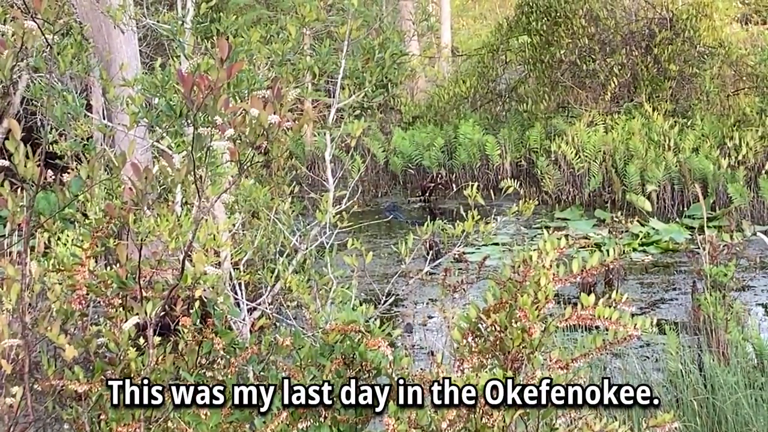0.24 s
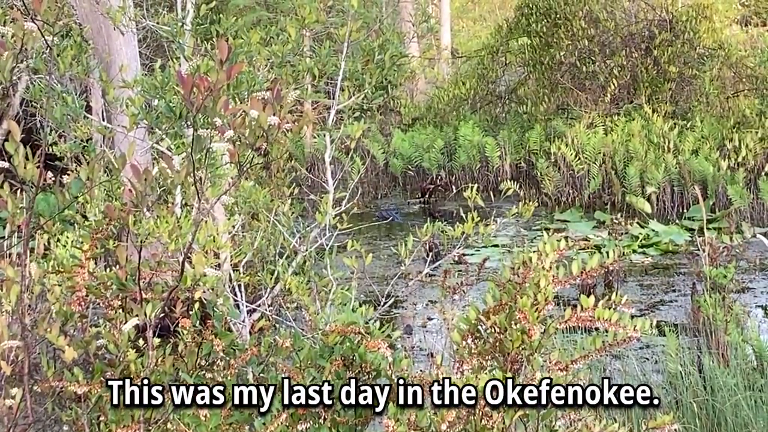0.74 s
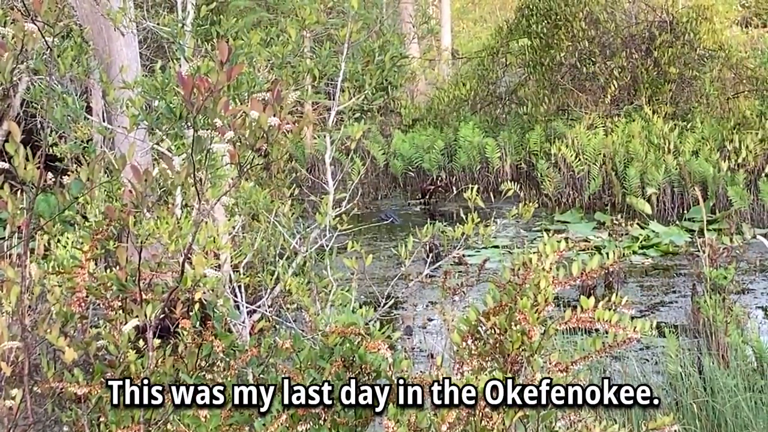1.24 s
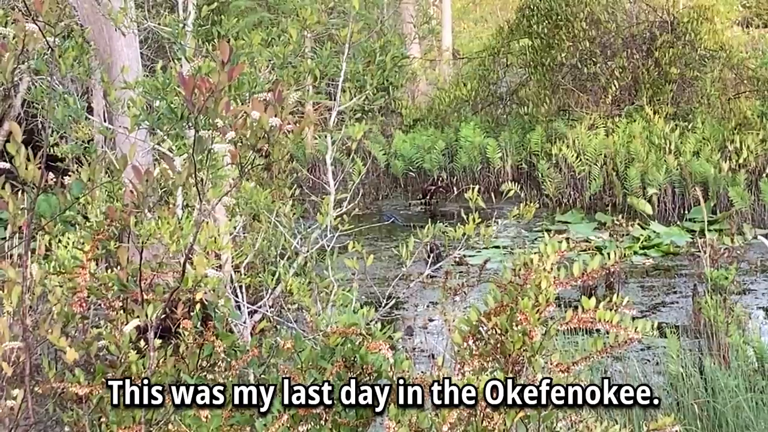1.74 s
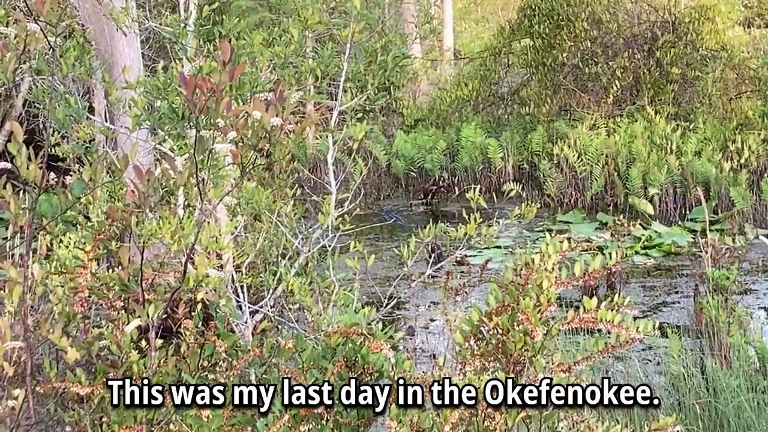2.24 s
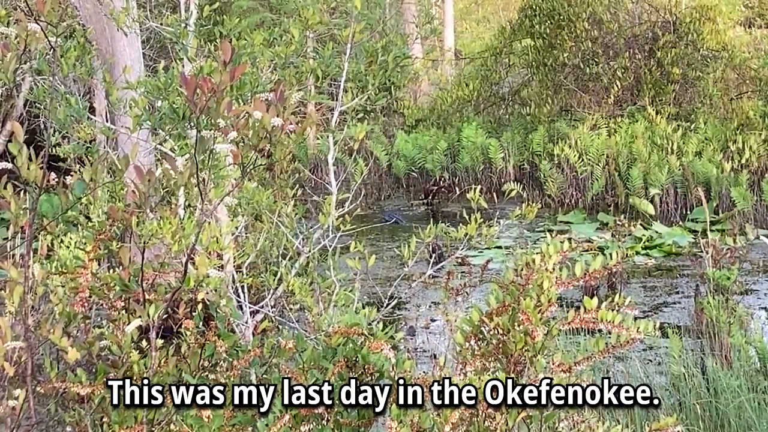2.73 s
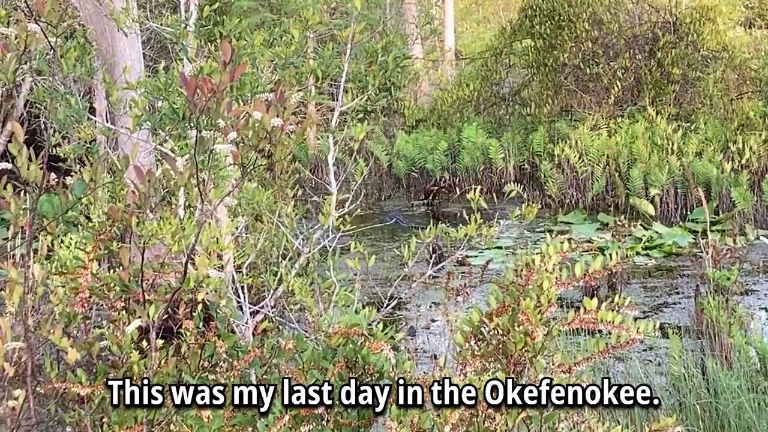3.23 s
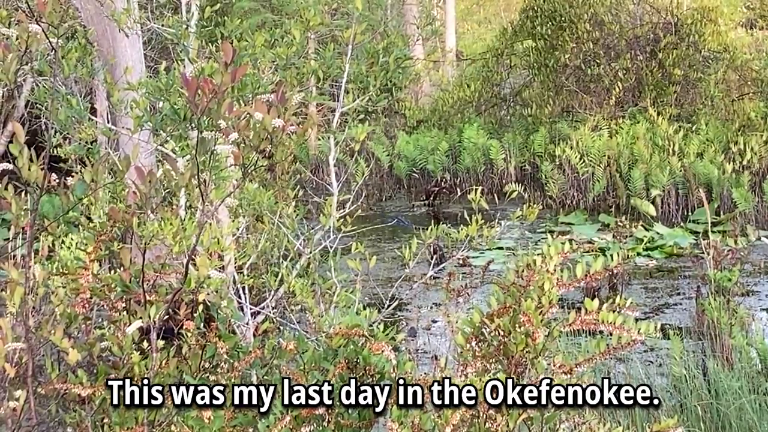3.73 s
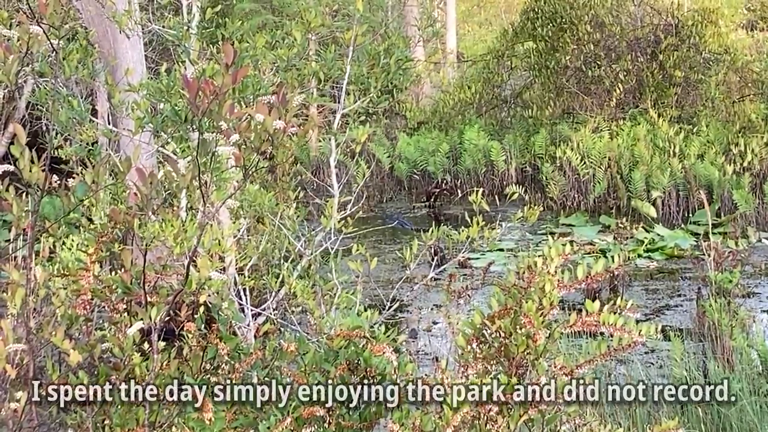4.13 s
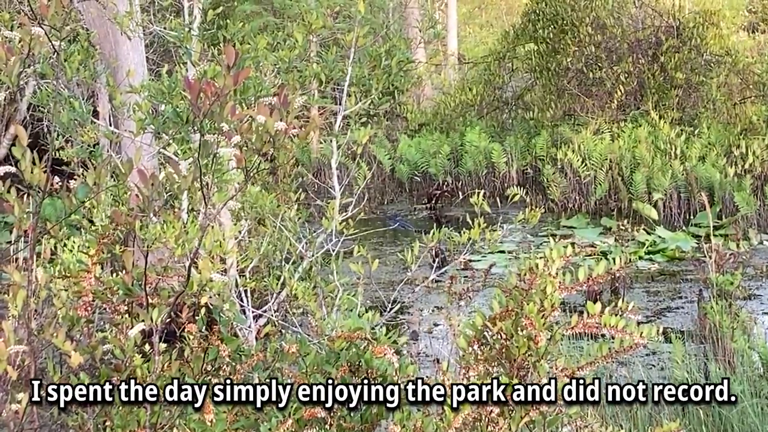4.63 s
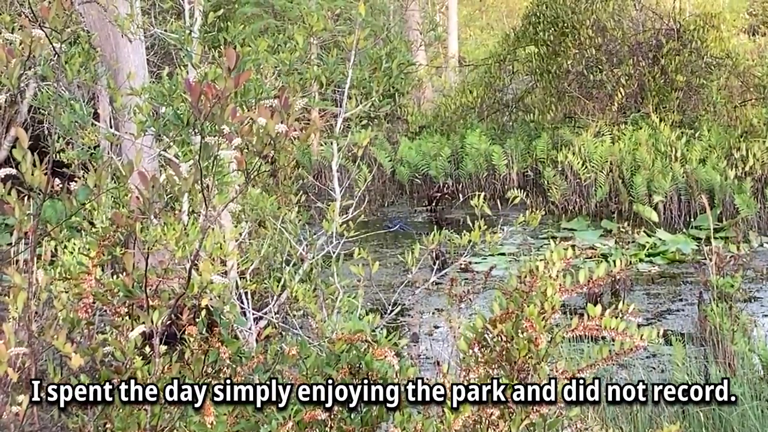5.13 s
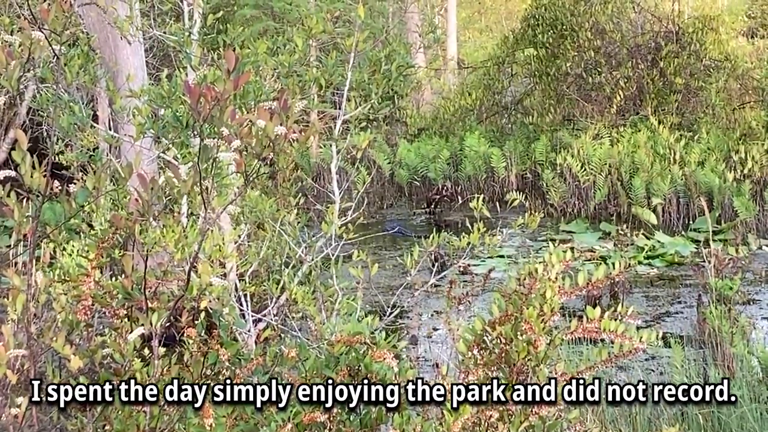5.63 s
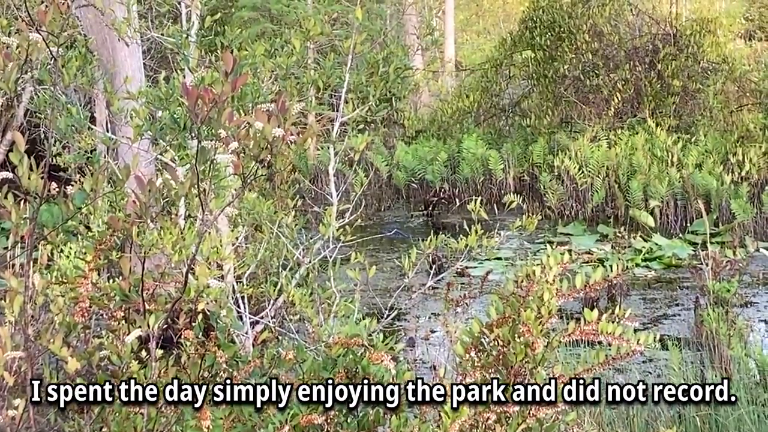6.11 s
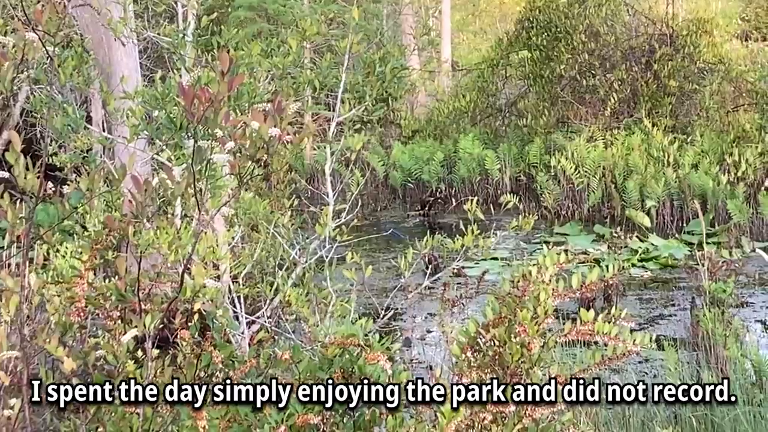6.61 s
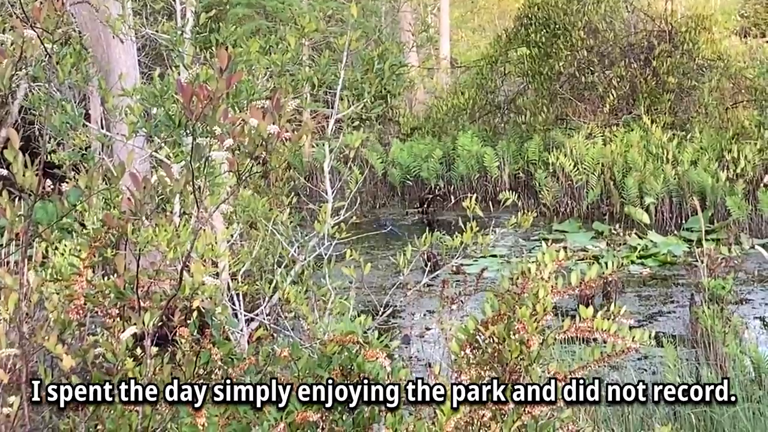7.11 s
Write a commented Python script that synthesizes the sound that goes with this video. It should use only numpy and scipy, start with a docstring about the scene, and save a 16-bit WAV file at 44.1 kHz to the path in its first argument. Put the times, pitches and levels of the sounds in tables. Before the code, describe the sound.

Loud clicking frog calls punctuate a quiet daytime swamp, with distant frog chorus, soft high insect trilling, and faint birds whistling toward the end.

```python
"""A still swamp by day. From the start small frogs near and far rattle click trains that ring their throats,
crickets trill in tone strokes, and a bird whistles gliding tones over filtered-noise rumble and hiss of air.
Just before two seconds one big frog grunts: slow pulses and rasp through a vocal sac.
A breath of wind swells the noise after four and a half seconds; then birds whistle rises, pips, chirps and
arches to the end. Fading noise tails echo every animal off trees and water."""
import sys
import numpy as np
from scipy import signal
from scipy.fft import rfft, irfft
from scipy.io import wavfile
from scipy.ndimage import uniform_filter1d, minimum_filter1d

SR = 44100
rng = np.random.default_rng(int(sys.argv[2]) if len(sys.argv) > 2 else 0)


def voltage_ratio(level):
    """Linear amplitude factor for a level in decibels (scalar or array-like)."""
    return 10 ** (np.asarray(level, float) / 20)


def inscribe(sig):
    """Save sig as 16-bit PCM at rate SR to the path in sys.argv[1].

    A 1-D sig is mono; a 2-D sig holds one channel per row.
    Samples are clipped to [-1, 1] before scaling.
    """
    pcm = np.round(np.clip(np.atleast_2d(sig).T, -1, 1) * 32767)
    wavfile.write(sys.argv[1], SR, pcm.astype(np.int16))


N = 324576
TIME = np.arange(N) / SR
SIDES = np.array([[1], [-1]])  # left, right


def level(x, db):
    """Scale to an rms level."""
    return x * voltage_ratio(db) / np.sqrt(np.mean(x ** 2))


def band(x, hz, width):
    """Two-pole resonance, gain 1 at the centre."""
    return signal.lfilter(*signal.iirpeak(hz, hz / width, fs=SR), x)


def add(out, s, sound):
    """Mix a two-channel sound in at time s."""
    i = int(s * SR)
    n = min(sound.shape[1], N - i)
    out[:, i:i + n] += sound[:, :n]


def place(pan_db):
    """Left and right gains for a left-minus-right level difference."""
    return voltage_ratio(SIDES * pan_db / 2)


def on_log(table, hz):
    """Read (Hz, value) points on a log-frequency axis."""
    points = np.array(table)
    return np.interp(np.log(hz), np.log(points[:, 0]), points[:, 1])


# small frogs' calls, the shortest being single clicks: start_s [s], level_db [dB], length_s [s], frog [name]
FROG_CALLS = [(0.034, -22, .051, "ahead"), (0.086, -22.5, .022, "shrill"), (0.217, -11, .054, "rival"),
              (.428, -19, .003, "shrill"), (0.607, -31, .004, "rival"), (0.7517, -23, .004, "lily"),
              (0.7776, -22, .051, "reeds"), (.97, -24, .0067, "lily"), (1.0948, -2, .055, "near"),
              (1.162, -10, .061, "rival"), (1.428, -24.5, 0.038, "deep"), (1.556, -17.5, .028, "across"),
              (1.712, -27, .018, "across"), (1.772, -23.5, .048, "reeds"), (2.019, -21.5, .05, "ahead"),
              (2.147, -12.5, .065, "rival"), (2.235, -15, .004, "shrill"), (2.493, -28, .029, "reeds"),
              (2.569, -23, .048, "lily"), (2.971, -1.5, .06, "near"), (3.043, -25, .05, "reeds"),
              (3.11, -22, .029, "reeds"), (3.307, -19, .043, "ahead"), (3.388, -20, .051, "lily"),
              (3.498, -22.5, .05, "shrill"), (3.7466, -12.5, .064, "rival"), (3.901, -23, .037, "lily"),
              (4.237, -31, .024, "reeds"), (4.315, -22.5, .049, "shrill"), (4.353, -14.5, .004, "reeds"),
              (4.4355, -16.5, .004, "rival"), (4.466, -10.5, .047, "rival"), (4.52, -2.5, 0.055, "near"),
              (4.599, -21.5, .055, "shrill"), (4.6942, -23.5, .037, "reeds"), (4.8, -18, .005, "lily"),
              (5.013, -14, .004, "rival"), (5.0253, -14.5, .004, "rival"), (5.065, -11, .045, "rival"),
              (5.436, -29, .034, "reeds"), (5.517, -21, .041, "shrill"), (5.6025, -16.5, .004, "rival"),
              (5.615, -14.5, .004, "rival"), (5.661, -10.5, 0.037, "rival"), (5.787, -23.5, .016, "lily"),
              (5.821, -18.5, .049, "ahead"), (5.908, -26, .051, "across"), (6.1, -25, .054, "lily"),
              (6.1446, -2, .062, "near"), (6.244, -9.5, .035, "rival"), (6.3445, -14.5, .004, "shrill"),
              (6.365, -16, .004, "shrill"), (6.39, -25, .025, "reeds"), (6.517, -16, .041, "across"),
              (6.701, -31.5, .074, "across"), (6.761, -19, .004, "rival"), (6.785, -16, .004, "rival"),
              (6.8266, -10.5, .034, "rival"), (7.0173, -18, .051, "ahead"), (7.279, -14, .004, "rival"),
              (7.287, -21, .02, "lily"), (7.353, -14, .009, "rival")]
# the frogs one can tell apart, by name: pitch_hz [Hz], rate [clicks/s], pan_db [dB, left minus right],
# lag_ms [ms, left behind right], swell_db [dB, how far below full level a rattle begins]
FROG_VOICES = {"near": (3790, 203, -2, -.25, -1), "rival": (3650, 200, -2, 0.5, 3),
               "ahead": (3562, 250.5, 1, 0.06, 0), "reeds": (3741.5, 194.5, -2, 0.05, 1),
               "shrill": (3949.5, 185, -2.5, -0.2, 1.5), "across": (3850, 184.5, -2.5, 0.6, 1.5),
               "lily": (3792, 180, -0.5, 0.5, 2.5), "deep": (3150, 159.5, 3.5, 0.5, 4.5)}


def frogs():
    """The calls one can point at; a frog's pitch and pace vary a little from call to call."""
    out = np.zeros((2, N))
    lucks = rng.standard_normal((len(FROG_CALLS), 25, 2))
    for (s, db, length, name), luck in zip(FROG_CALLS, lucks):
        hz, rate, pan_db, lag_ms, swell_db = FROG_VOICES[name]
        mood = luck[-1]
        call_rate = rate * (1 + .04 * mood[0])
        call_hz = hz * (1 + 0.0033 * mood[1])
        add(out, s, small_frog(db, length, call_rate, call_hz, pan_db, lag_ms, luck[:-1], swell_db))
    return out


SPEED_UP = .18  # how much the click spacing shrinks over a call, as a share of its mean
TENSION = .02  # share by which a tense click rings higher and a slack one lower


def small_frog(db, length, rate, hz, pan_db, lag_ms, luck, swell_db=0):
    """A quickening train of clicks; those that come early are tense, the late ones slack."""
    progress = np.arange(len(luck)) / max(length * rate, 1)
    spacing = 1 + .04 * luck[:, 0] + SPEED_UP * (.5 - np.minimum(progress, 1))
    at = np.cumsum(spacing) / rate
    at -= at[0]
    on = at <= length
    done = at[on] / length
    # rattles swell at first, calls of one or two clicks are firm
    swell = swell_db * (on.sum() > 2) * (1 - done) ** 3
    # the last clicks weaken as the breath runs out
    size = voltage_ratio(1.5 * luck[on, 1] * (at[on] > 0) - swell - 9 * done ** 3)
    call = 0
    for tense in (1, -1):
        train = np.zeros(int(at[-1] * SR) + 1)
        train[(at[on] * SR).astype(int)] = size * (tense * luck[on, 0] < 0)
        ring = click_ring(db, hz * (1 + tense * TENSION), lag_ms)
        call = call + signal.fftconvolve(ring, train[None])
    return call * voltage_ratio(db) * place(pan_db)


# throat resonances that each click rings: ratio [multiple of the throat pitch],
# mode_db [dB, for a call at 0 dB], t60 [s]
THROAT_MODES = [(1, -3.5, 0.02), (0.918, -13.5, 0.014), (1.081, -20.5, 0.014), (0.473, -21, 0.0076),
                (0.659, -21, 0.012), (0.801, -20, 0.012), (1.341, -26, 0.0078), (1.619, -23, 0.0068),
                (1.85, -16, 0.0058), (2.08, -16.5, 0.0059), (2.38, -15.5, 0.0042), (2.618, -21, 0.0057),
                (3.599, -29.5, 0.0051), (4.0, -40.5, 0.0058)]
FAR_DULL = 0.65  # dB lost by modes well off the pitch, per dB of distance
FAR_SPREAD = .5  # dB gained by the two side rings per dB of distance: far calls sound broader
SAG, SAG_S = 0.027, 0.0028  # share by which each click starts sharp; settling time constant
SWELL_S = .0006  # time constant of the click's onset
CLICK_FLOOR = signal.butter(4, 1350, "high", fs=SR, output="sos")


def click_ring(db, hz, lag_ms):
    """One click, swelling for a millisecond and ringing out in the throat; call level stands for distance."""
    late = np.maximum(np.arange(900) / SR - .0005 - SIDES * lag_ms / 2000, 0)
    ratio, mode_db, t60 = np.transpose(THROAT_MODES)[:, :, None, None]
    overtone = np.abs(np.log2(ratio)) > 1 / 4
    beside = ~overtone & (ratio != 1)
    distant_db = mode_db + (overtone * FAR_DULL - beside * FAR_SPREAD) * db
    gain = voltage_ratio(np.minimum(distant_db, -3 * beside))
    turns = hz * (late + SAG * SAG_S * (1 - np.exp(-late / SAG_S)))
    fade = np.exp(-np.log(1000) * late / t60)
    ring = gain * fade * np.sin(2 * np.pi * ratio * turns)
    onset = (1 - np.exp(-late / SWELL_S)) ** 2
    click = signal.sosfilt(CLICK_FLOOR, ring.sum(axis=0) * onset)
    return click / np.abs(click).max()


# big frog's vocal sac: pitch_hz [Hz], width_hz [Hz, before two unequal filter passes],
# level_db [dB rms, relative to the grunt level]
SAC_MODES = [(319, 13, -4), (350, 48, -6.5), (425, 40, -10), (620, 150, -15), (1230, 240, -9),
             (1670, 170, -15), (1850, 120, -18)]
GRUNT_HZ = 42  # glottal pulses per second
# effort rises, holds and dies away
GRUNT_S, GRUNT_DB, GRUNT_RISE_S, GRUNT_HOLD_S = 1.921, -31, 0.07, .075
GRUNT_RISE_DB, GRUNT_FALL_DB_PER_S = 13, 210
GRUNT_OPENING = .7  # extra dB the upper resonances lose per dB of missing effort


def big_frog():
    """Slow glottal pulses, each trailing a rasp of air, ring a large vocal sac."""
    t = TIME - GRUNT_S
    rise_db = np.maximum(GRUNT_RISE_DB * (1 - t / GRUNT_RISE_S), 0)
    fall_db = GRUNT_FALL_DB_PER_S * np.maximum(t - GRUNT_RISE_S - GRUNT_HOLD_S, 0)
    missing_db = np.minimum(rise_db + fall_db, 150)
    beat = GRUNT_HZ * (TIME - 1.952)
    count = np.floor(beat)
    pulses = np.diff(count, prepend=count[0]) * (-1) ** count  # push and pull in turn
    rasp = rng.standard_normal(N) * np.exp(-(beat % 1) / 2.9)
    voice = 0
    for hz, width, mode_db in SAC_MODES:
        # the rasp rules the upper resonances, which open up only at full effort
        upper = min(hz / 800, 1) ** 2
        drive = pulses + .05 * (.15 + upper) * rasp
        once = band(drive, hz, 1.7 * width)
        ring = level(band(once, hz, 0.87 * width), mode_db)
        voice = voice + ring * voltage_ratio(GRUNT_DB - missing_db * (1 + GRUNT_OPENING * upper))
    voice = voice * (t > 0)
    return np.array([voice, np.roll(voice, shift=9)])  # right lags by 9 samples


# rising whistle's shape: after_s [s from its start], pitch_hz [Hz], note_db [dB, added to the repeat's level]
RISE_SHAPE = [(0, 2330, -16), (.02, 2450, -6), (.06, 2720, 0), (.085, 2990, -3), (.1, 3150, -20)]
# rising whistle's repeats: start_s [s], level_db [dB]
RISE_REPEATS = [(5.669, -37.5), (6.031, -40), (6.405, -37.5), (6.783, -38), (7.1, -39.5)]
# short, nearly level notes: start_s [s], length_s [s], level_db [dB]
PIP_NOTES = [(.155, 0.067, -42), (.48, .06, -43.5), (6.011, 0.042, -39), (6.248, 0.034, -36),
             (6.327, 0.071, -40.5), (6.595, 0.09, -46), (6.893, 0.033, -31.5), (6.935, 0.034, -32),
             (6.984, 0.036, -39), (7.191, 0.038, -31.5), (7.245, 0.04, -37)]
PIP_HZ = 3225  # pitch the pips glide around
# quick upward chirp's shape: after_s [s], pitch_hz [Hz], note_db [dB, added to the repeat's level]
CHIRP_SHAPE = [(0, 3650, -14), (.008, 3900, 0), (.02, 4250, -2), (.028, 4200, -16)]
# chirp's repeats: start_s [s], level_db [dB]
CHIRP_REPEATS = [(6.694, -37), (6.99, -34)]
# second bird, a held note and an arch: after_s [s], pitch_hz [Hz], note_db [dB, added to the repeat's level]
ARCH_SHAPE = [(0, 1630, -18), (.012, 1690, -10), (.045, 1660, -8), (.058, 1590, -12), (.068, 1900, -4),
              (.085, 2440, -9), (.1, 2250, -8), (.11, 1970, -3), (.118, 1850, -18)]
# arch's repeats: start_s [s], level_db [dB]
ARCH_REPEATS = [(0.014, -39.5), (0.324, -39.5), (5.859, -52), (6.16, -46), (6.459, -41), (6.749, -39),
                (7.052, -38)]
BIRD_WET_DB = -9


def birds():
    """Rises and arches come about three times a second in each run, with pips and chirps among them."""
    out = np.zeros((2, N))
    for s, db in RISE_REPEATS:
        add(out, s, whistle(RISE_SHAPE, db, 1.9, 0.044))
    for s, length, db in PIP_NOTES:
        pip = [(0, PIP_HZ - 60, -20), (.008, PIP_HZ + 40, 0),
               (length - .008, PIP_HZ - 30, -4), (length, PIP_HZ - 60, -20)]
        add(out, s, whistle(pip, db, 0.88, .03))
    for s, db in CHIRP_REPEATS:
        add(out, s, whistle(CHIRP_SHAPE, db, 1.0, .03))
    for s, db in ARCH_REPEATS:
        add(out, s, whistle(ARCH_SHAPE, db, -0.78, 0.12))
    # they sit deep among the trunks, so much of their sound arrives scattered
    return out + echoes(out, 0.15, BIRD_WET_DB, 0.0067)


BIRD_FLICKER_DB, BIRD_FLICKER_S = 4, .012  # foliage breaks up the far whistles: spread and pace


def whistle(shape, db, pan_db, lag_ms):
    """A pure tone that follows a pitch and level shape and flickers on its way through the leaves."""
    s, hz, note_db = np.transpose(shape)
    t = np.arange(int(s[-1] * SR)) / SR
    pitch = np.interp(t, s, hz)
    flicker = BIRD_FLICKER_DB * np.interp(t / BIRD_FLICKER_S, np.arange(16), rng.standard_normal(16))
    phase = 2 * np.pi * (np.cumsum(pitch) / SR - SIDES * pitch * lag_ms / 2000)
    return np.sin(phase) * voltage_ratio(db + flicker + np.interp(t, s, note_db)) * place(pan_db)


# nearest cricket's bouts: start_s [s], length_s [s], level_db [dB, before the bouts are doubled]
CRICKET_BOUTS = [(.13, .19, -36.5), (0.88, 0.17, -40), (1.6, 0.23, -39.5), (2.8, 0.17, -40),
                 (3.501, 0.15, -38.5), (4.204, 0.19, -39), (4.935, 0.15, -36), (5.586, 0.15, -38),
                 (6.326, 0.19, -36), (7.03, 0.17, -38.5)]
FAR_CRICKETS_DB = -45
FAR_BOUT_S, FAR_BOUT_DB = 0.61, 3  # far swell's length, varied per cricket; rise and dip about the mean


def crickets(count=5):
    """One near cricket in bouts; several further off that swell and sink, each at its own pace."""
    bouts = 0
    for s, length, db in CRICKET_BOUTS:
        edges = np.minimum((TIME - s) / 0.06, (s + length - TIME) / 0.013)
        bouts = bouts + voltage_ratio(db) * np.clip(edges, 0, 1)
    near = 2 * bouts * cricket(4455, 46, -15, 0.042, 0)
    far = 0
    for k, u in enumerate(rng.random((count, 6))):
        hz = 4300 + 450 * (k + u[0]) / count
        trill = cricket(hz, 47 + 12 * u[1], -23.5, .5 * u[2] - .25, u[3])
        turn = TIME / FAR_BOUT_S / (0.785 + 0.45 * u[4]) + u[5]
        far = far + trill * voltage_ratio(FAR_BOUT_DB * np.sin(2 * np.pi * turn))
    return near + level(far, FAR_CRICKETS_DB)


def cricket(hz, rate, octave_db, lag_ms, start):
    """Wing strokes: each a short tone that sags in pitch, with its own size and a faint octave."""
    beat = rate * TIME + start
    stroke = beat % 1
    luck = rng.standard_normal((500, 2))[beat.astype(int)]
    pitch = hz + 40 * luck[:, 0] + 120 * (.3 - stroke)
    phase = 2 * np.pi * (np.cumsum(pitch) / SR - SIDES * hz * lag_ms / 2000)
    shape = np.sin(np.pi * np.clip(stroke / .65, 0, 1)) ** 2
    tone = np.sin(phase) + voltage_ratio(octave_db) * np.sin(2 * phase)
    return shape * voltage_ratio(2.8 * luck[:, 1]) * tone


# level of the far chorus together with the blurred tails of nearer calls: time_s [s], level_db [dB]
CHORUS_LEVEL = [(0, -34), (.5, -43), (1.35, -42), (2.4, -45.5), (3.03, -47.5), (3.25, -40.5), (4.1, -44),
                (4.55, -33), (4.8, -43), (5.43, -43.5), (5.7, -36), (6.1, -39), (6.31, -34), (6.9, -39),
                (7.36, -34)]


def far_frogs(count=50, size=22):
    """Distant callers, each with its own pitch, distance and bearing, calling at random moments."""
    out = np.zeros((2, N))
    callers = rng.random((count, 6))
    moments = rng.random((count, size))
    lucks = rng.standard_normal((count, 16, 2))
    for u, when, luck in zip(callers, moments, lucks):
        hz = 3050 + 640 * (u[0] + u[2])
        call = small_frog(-36 - 7 * u[1], 0.056 * u[5] + 0.0055, 200, hz, 4 * u[3] - 2.5,
                          0.623 * u[4] - .28, luck)
        for s in when * TIME[-1]:
            add(out, s, call)
    # the chorus has no beginning: calls are already under way at the start
    chorus = np.roll(out, N // 2, axis=1)
    return level(chorus, 0) * voltage_ratio(np.interp(TIME, *np.transpose(CHORUS_LEVEL)))


def echoes(x, t60, db, gap_s):
    """Scattering from trunks and water: a fading noise tail, different in each channel."""
    t = np.arange(int(t60 * SR)) / SR
    tail = rng.standard_normal((2, len(t))) * np.exp(-np.log(1000) * t / t60) * (t > gap_s)
    tail = signal.lfilter([.5, .5], [1], tail)  # softens the treble
    tail = tail / np.sqrt(np.sum(tail ** 2) / 2)
    return voltage_ratio(db) * signal.fftconvolve(x, tail, axes=1)[:, :N]


# tone of the air: frequency_hz [Hz], level_db [dB, relative]
AIR_TONE = [(12, -38), (25, -7), (62, -2.5), (100, -6.5), (189, -17), (340, -16), (476, -25), (1000, -24.5),
            (2490, -34), (4700, -33.5), (5400, -49.5), (9300, -32), (10700, -41.5), (11700, -55.5),
            (13000, -38), (14500, -37), (16300, -71)]
# how alike left and right are in the air: frequency_hz [Hz], likeness [-1 opposed to 1 same]
AIR_LIKENESS = [(60, 0.87), (130, 0.37), (290, 0.072), (640, -0.64), (1400, -0.73), (3100, 0.2),
                (7000, 0.28), (15000, -0.81)]
AIR_DB = -43.5  # rms before the gust
# one breath of wind
GUST_S, GUST_LENGTH_S, GUST_EDGE_S, GUST_LEAVES_DB, GUST_RUMBLE_DB = 4.54, 1.35, 0.18, 3, 2


def air():
    """Smooth distant hiss and rumble; the lowest octaves and the leaves swell with a gust."""
    hz = np.maximum(np.fft.rfftfreq(N, 1 / SR), 1)
    alike = np.clip(on_log(AIR_LIKENESS, hz), -1, 1)
    noise = rfft(rng.standard_normal((2, N))) * voltage_ratio(on_log(AIR_TONE, hz))
    mid, side = noise * np.sqrt([1 + alike, 1 - alike])
    both = rfft(level(irfft(mid + SIDES * side, N), AIR_DB))
    low = 1 / (1 + (hz / 110) ** 4)
    leaf = np.exp(-np.log2(hz / 800) ** 4)
    gust_edges = np.minimum(TIME - GUST_S, GUST_S + GUST_LENGTH_S - TIME) / GUST_EDGE_S
    gust = np.clip(gust_edges, 0, 1)
    rest = irfft(both * (1 - low - leaf), N)
    rumble = irfft(both * low, N) * voltage_ratio(GUST_RUMBLE_DB * gust)
    leaves = irfft(both * leaf, N) * voltage_ratio(GUST_LEAVES_DB * gust)
    return rest + rumble + leaves


BANK_T60_S, BANK_DB = 0.052, -11
WOODS_T60_S, WOODS_DB = .6, -15.5


def scene():
    """All the animals share the echoes of bank and woods; the air lies under them."""
    animals = frogs() + far_frogs() + crickets() + big_frog() + birds()
    bank = echoes(animals, BANK_T60_S, BANK_DB, 0.0021)
    woods = echoes(animals, WOODS_T60_S, WOODS_DB, 0.01)
    return animals + bank + woods + air()


def roll_off(x):
    """The treble ends steeply here."""
    return signal.sosfilt(signal.butter(12, 16460, fs=SR, output="sos"), x)


# stereo processing's width, wider near 6.5 kHz and narrower near 10 kHz: frequency_hz [Hz], side_db [dB]
STEREO_WIDTH = [(1000, 1.5), (4500, 0), (6500, 4.5), (10000, -10), (13000, -3.5)]
# microphone housing's colour: frequency_hz [Hz], gain_db [dB]
MIC_HOUSING = [(10000, 2), (10800, 5), (11700, -4.5), (12700, 6.5), (13500, 3.5)]
CEILING = .93  # peak level the limiter aims to hold, full scale = 1


def record(dry):
    """Stereo processing sets the width by frequency; a look-ahead limiter holds the loudest clicks."""
    hz = np.maximum(np.fft.rfftfreq(N, 1 / SR), 1)
    mid = rfft(dry[0] + dry[1])
    side = rfft(dry[0] - dry[1]) * voltage_ratio(on_log(STEREO_WIDTH, hz))
    heard = irfft((mid + SIDES * side) / 2 * voltage_ratio(on_log(MIC_HOUSING, hz)), N)
    room = CEILING / np.maximum(np.abs(heard).max(axis=0), CEILING)
    gain = uniform_filter1d(minimum_filter1d(room, size=176), size=88)  # 4 ms hold, 2 ms smoothing
    return roll_off(heard * gain)


dry = scene()
out = record(dry)
inscribe(out)
```